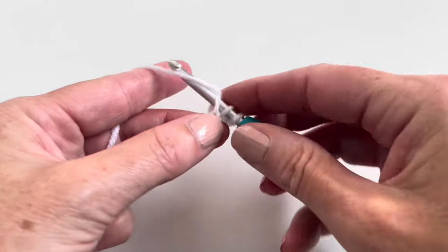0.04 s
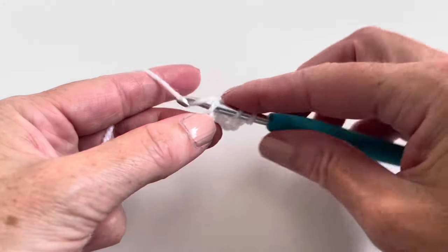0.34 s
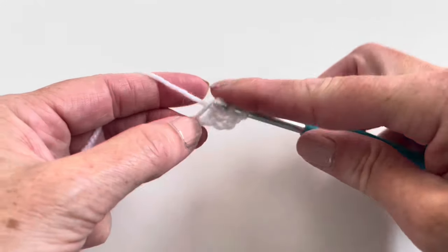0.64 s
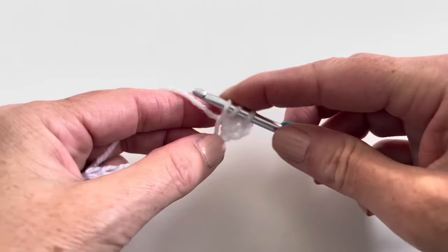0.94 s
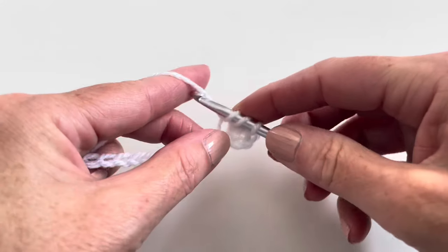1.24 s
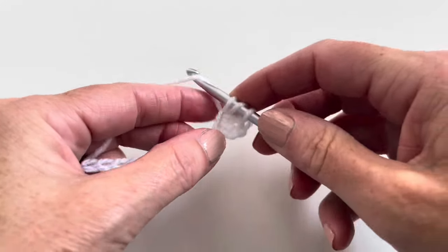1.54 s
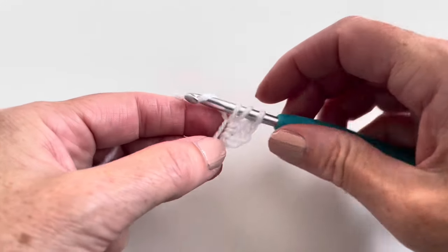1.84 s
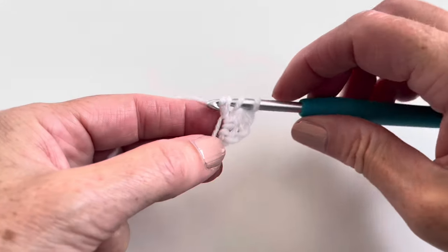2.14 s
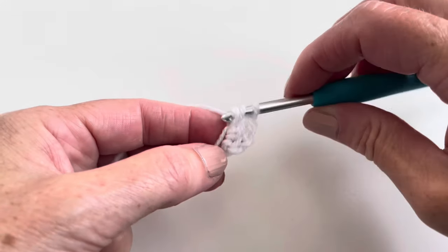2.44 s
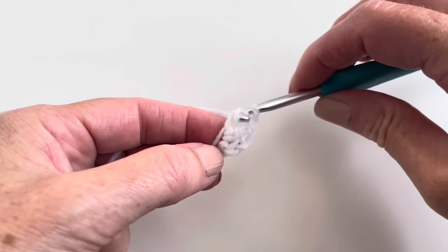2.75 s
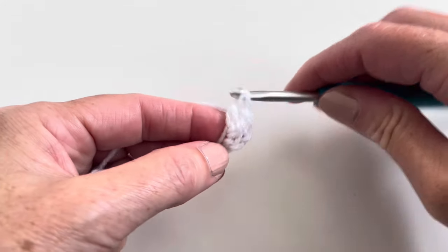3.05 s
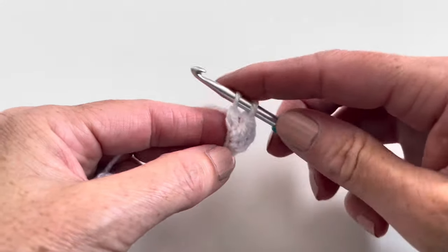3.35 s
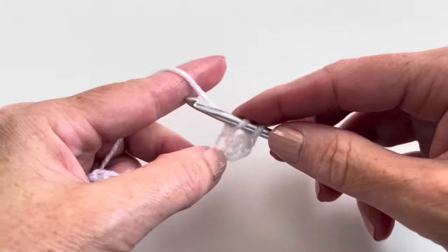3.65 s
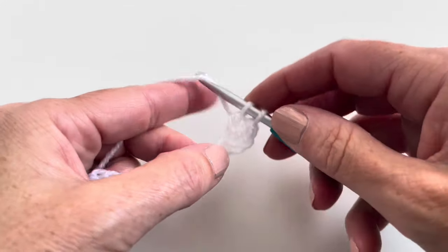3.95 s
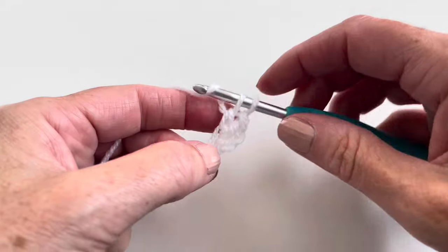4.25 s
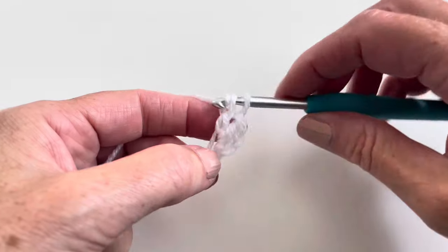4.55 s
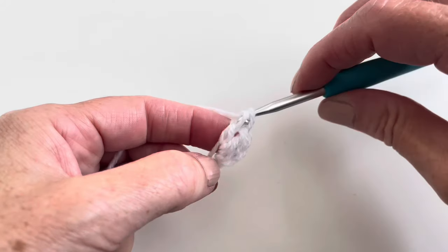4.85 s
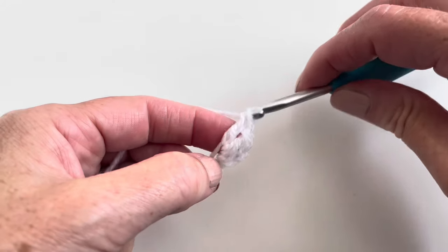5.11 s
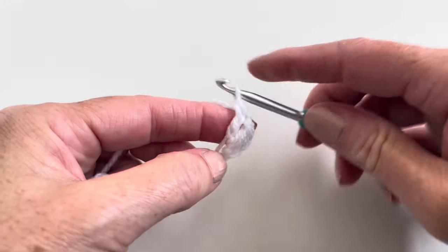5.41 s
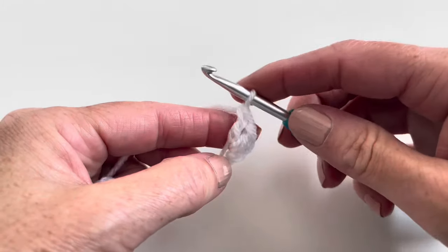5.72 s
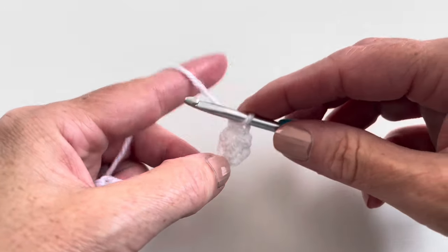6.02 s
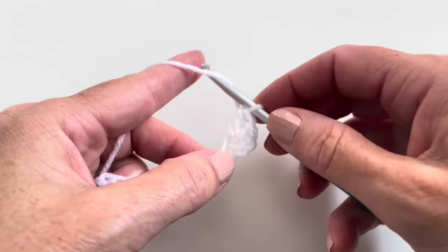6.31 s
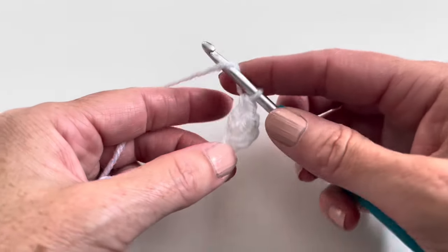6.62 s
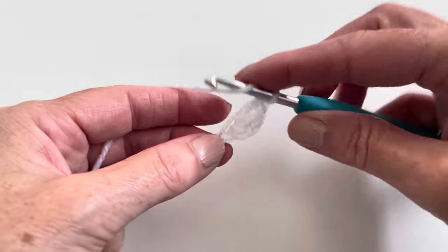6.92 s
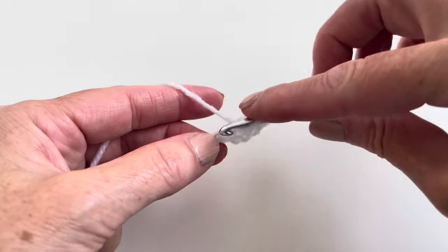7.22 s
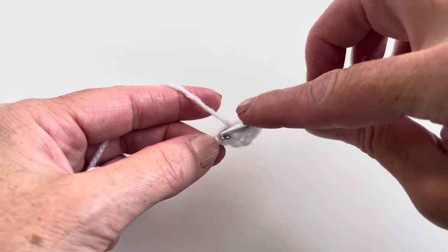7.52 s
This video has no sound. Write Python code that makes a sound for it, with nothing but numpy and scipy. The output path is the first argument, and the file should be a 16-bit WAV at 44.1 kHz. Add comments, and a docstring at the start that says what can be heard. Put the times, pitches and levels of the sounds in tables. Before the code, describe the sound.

Very quiet, close sounds of yarn being worked with a metal hook, over low indoor rumble and microphone hiss. A soft swish comes first, then one small, sharp click of the hook on a nail. After that the yarn slides and catches in brief, scattered rustles, with a few tiny ticks of slipping fibres. In the second half, far-off traffic gradually swells through the walls.

```python
"""A quiet room, with someone crocheting close to a two-port microphone. Yarn swishes through the fingers
and rasps over a metal hook in countless tiny slips; single fibres snap free and skin rubs on the grip.
The hook touches the nails lightly and once clicks against one. Behind the hands the room rumbles,
distant traffic slowly swells through the walls, and the microphone hisses."""
import sys
import numpy as np
from scipy import signal
from scipy.fft import rfft, irfft, next_fast_len
from scipy.io import wavfile
from scipy.ndimage import uniform_filter1d, map_coordinates

SR = 44100
rng = np.random.default_rng(int(sys.argv[2]) if len(sys.argv) > 2 else 0)


def dump_mix(stems):
    """Bounce the given channels to the path in sys.argv[1] as a 16-bit WAV at rate SR."""
    frames = np.atleast_2d(stems).T  # one column per channel
    limited = np.clip(frames, -1, 1)  # hard clip at full scale
    pcm = np.round(limited * 32767).astype(np.int16)
    wavfile.write(sys.argv[1], SR, pcm)


N = 342657
TIME = np.arange(N) / SR

# Tone of the mic hiss, room rumble, engines and tyres. Each row: frequency in Hz, relative level in dB.
HISS_TONE = [(300, 0.5), (1500, -8), (2600, -4.5), (4000, -8), (7000, -9), (10000, -7), (11400, 1),
             (12300, -5.5), (13000, 4.5), (13350, -9.5), (13700, -30), (15700, -43)]
ROOM_TONE = [(20, -40), (32, -38), (42, -15.5), (85, -4.5), (110, -7.5), (130, -17.5), (155, -12.5),
             (185, -21.5), (260, -27.5), (320, -25), (430, -28.5), (600, -30.5), (1000, -34), (2500, -52.5),
             (4000, -99)]
ENGINE_TONE = [(32, -41), (55, -7.5), (70, -4), (95, -4), (120, -5.5), (150, -19.5), (190, -7.5),
               (225, -13.5), (255, -14.5), (290, -21.5), (400, -26.5), (480, -35.5), (620, -48), (810, -79),
               (1400, -120)]
TYRE_TONE = [(250, -30), (400, -13), (700, -2.5), (1000, 3.5), (1400, -5), (2000, -20.5), (2600, -18),
             (4000, -33), (8000, -83)]
# Stereo width of the hiss, room, road and hands. Each row: frequency in Hz, side minus mid in dB.
HISS_STEREO = [(1000, -3.5), (1900, -4.5), (2800, 1.5), (6000, -4.5), (8200, 2), (9200, 17), (10000, 88),
               (10700, 27), (11400, 4.5), (13000, -1.5)]
ROOM_STEREO = [(60, -29), (110, -14), (200, -0.5), (380, 3), (700, 13), (1290, 4.5), (2380, -9)]
ROAD_STEREO = [(60, -47.5), (110, -19), (200, -11), (380, -3.5), (600, -1), (1000, 2.5), (1300, -8.5),
               (2000, -24), (3000, -4)]
HAND_STEREO = [(500, -19), (1200, -6), (1900, -42), (3200, -7), (4700, -14), (5600, -9.5), (6800, 0.5),
               (8200, 0), (9200, 13.5), (10000, 96), (10700, 18.5), (11500, 5.5), (13000, -5.5),
               (14000, -1)]
# Resonances of the electronics' whine and the room's boom, drone and hum.
# Each row: centre in Hz, half-width in Hz, relative level in dB.
WHINE_MODES = [(12806, 14, 0), (13037, 12, -3)]
BOOM_MODES = [(47.1, 10.9, 0)]
DRONE_MODES = [(79.8, 8.9, -1.8), (99.14, 5.9, -0.68)]
HUM_MODES = [(131.6, 7, -1), (150.1, 8, 5.5), (182.8, 16, -8.5), (226.3, 9.5, -14)]
# Fader rides for the boom, drone and hum. Each row: time in seconds, relative level in dB.
BOOM_RIDE = [(0, -78), (.3, -56), (.45, -75), (.65, -59.5), (1.3, -68), (1.52, -48.5), (1.8, -63),
             (2.35, -55.5), (2.7, -45), (2.85, -51), (3.2, -49), (3.6, -63), (4.15, -44), (4.33, -55),
             (4.42, -40), (4.52, -48), (5.25, -49.5), (5.48, -57.5), (5.65, -38.5), (5.83, -57.5),
             (5.98, -40), (6.1, -61), (6.24, -43), (6.36, -50), (6.54, -41), (6.66, -49), (6.95, -55.5),
             (7.2, -44.5), (7.42, -59), (7.57, -42), (7.77, -53.5)]
DRONE_RIDE = [(0, -57.5), (.25, -55), (.5, -73), (.63, -51.5), (.95, -56), (1.17, -51), (1.29, -58.5),
              (1.5, -50), (1.87, -56.5), (2.2, -52.5), (3.35, -54), (4.25, -52), (5.15, -50.5), (5.37, -60),
              (5.65, -51.5), (7.77, -48)]
HUM_RIDE = [(0, -77), (.3, -64.5), (.65, -64), (1, -74), (1.45, -65), (1.9, -76.5), (2.2, -61),
            (4.6, -62.5), (5.3, -63.5), (6.8, -62), (7.77, -62)]
# Fader rides for the traffic: one vehicle passes, then a closer one arrives and the tyres' upper band
# flares. Each row: time in seconds, relative level in dB.
ENGINE_RIDE = [(0, -80), (1.8, -74.5), (4.4, -67.5), (5.3, -67), (5.8, -61.5), (6.4, -63.5), (6.65, -58.5),
               (6.82, -56), (7.2, -56), (7.4, -53.5), (7.77, -54.5)]
TYRE_RIDE = [(0, -106), (3.85, -88), (4.01, -79.5), (4.14, -84.5), (4.27, -75), (4.48, -76), (4.56, -79.5),
             (4.72, -77), (4.87, -73.5), (4.99, -83.5), (5.14, -81), (5.69, -82), (5.8, -88), (5.94, -77.5),
             (6.08, -82.5), (6.18, -74), (6.26, -81), (6.34, -71.5), (6.46, -78), (6.54, -68),
             (6.61, -76.5), (6.68, -72), (6.79, -67.5), (6.92, -68.5), (7.1, -71), (7.19, -67.5),
             (7.3, -68), (7.42, -66.5), (7.54, -66), (7.6, -72), (7.68, -66.5), (7.77, -66)]
UPPER_TYRE_RIDE = [(0, -110), (6.44, -95), (6.53, -79), (6.65, -84), (6.8, -77.5), (6.97, -81.5),
                   (7.05, -78), (7.15, -94), (7.42, -81), (7.6, -88), (7.77, -76)]
# The tyres' two bands sink as each vehicle goes by. Each row: time in seconds, pitch in Hz.
TYRE_GLIDE = [(0, 1060), (4, 1066), (4.3, 987), (4.8, 922), (5.3, 970), (6.35, 940.5), (6.85, 874),
              (7.15, 900), (7.45, 928), (7.77, 881)]
UPPER_TYRE_GLIDE = [(6.5, 1936), (6.8, 1810), (6.93, 1777), (7.07, 1600), (7.38, 1830), (7.55, 1784),
                    (7.75, 1504)]

# Tone of rubbing skin, sliding yarn and a tight loop at focus 1.
# Each row: frequency in Hz, relative level in dB.
SKIN_TONE = [(150, -51), (400, 1), (800, 4), (1400, -5), (2050, -1), (2600, -2.5), (3300, -15), (8000, -62)]
YARN_TONE = [(800, -26), (2000, -19), (2700, -9), (3150, -2), (3750, -10.5), (4400, -8), (5300, -11),
             (6100, 0.5), (7000, -0.5), (8600, -3.5), (10000, 2), (11500, -1.5), (12800, -4.5),
             (13600, -14), (15700, -28)]
RASP_TONE = [(1000, -63), (3200, -30), (6100, -14), (8600, -11), (10000, -1), (11600, 0), (12800, -2.5),
             (13700, -9), (15700, -14.5)]
# Finger rubs. Each row: peak time in seconds, length in seconds, relative level in dB, resonance in Hz.
FINGER_RUBS = [(1.959, 0.16, -78.5, 1500), (2.006, 0.066, -77, 1980), (2.093, 0.062, -85, 2300),
               (3.155, 0.06, -80, 1050), (3.255, 0.08, -82.5, 2150), (5.373, 0.16, -86.5, 2200),
               (7.666, .034, -81, 2450)]
# The hook's shaft touching the nails. Each row: start in seconds, level in dB, pitch in Hz.
NAIL_TAPS = [(.628, -69.5, 3460), (4.714, -69.5, 3880), (7.21, -73, 3700)]
# The hook's ring. Each row: frequency in Hz, relative level in dB, time to fall 60 dB in seconds.
HOOK_MODES = [(3950, -10.5, 0.0067), (5840, -1.5, 0.0046), (7600, -1.5, 0.0042), (9700, 1, 0.004),
              (11000, -1, 0.0033)]
# Hook on nail, contact then rebound. Each row: start in seconds, relative level in dB.
CLICK_HITS = [(1.5505, -40), (1.5517, -63)]
# A tight loop on the hook. Each row: peak time in seconds, length in seconds, level in dB,
# focus (1 is broad and crisp, 2 a thin squeak).
LOOP_RASPS = [(.905, .045, -69.5, 1), (2.125, .04, -75.5, 1.9), (2.61, 0.11, -72, 0.95),
              (2.996, .065, -69, 1.2), (3.461, 0.067, -68.5, 0.88), (5.226, 0.06, -68, 1.3),
              (5.919, 0.071, -80, 2), (6.42, .036, -66.5, 2.8), (6.77, 0.1, -74.5, 2.7)]
# Fibres slipping off the hook. Each row: start in seconds, peak in dB, brightness in dB per octave.
FIBRE_SNAPS = [(3.982, -54, 17), (5.06, -66, -12), (5.849, -64, 4)]
# Yarn drawn through the fingers and the stitch.
# Each row: peak time in seconds, length in seconds, level in dB, brightness in dB per octave.
YARN_PULLS = [(.385, 0.27, -69.5, 7.5), (.44, 0.11, -70.5, 3), (.625, 0.047, -83, -9),
              (.63, 0.077, -77, 14), (1.578, .03, -70, 6), (2.69, 0.1, -72.5, 2), (3.25, 0.11, -75, 9),
              (3.455, 0.09, -67, -3), (3.51, 0.12, -66, 1), (3.66, 0.055, -71, 3), (4.835, 0.11, -72, 10),
              (5.063, 0.033, -72.5, 5), (5.918, 0.15, -63.5, 0), (6.05, 0.076, -75.5, -2.5),
              (6.135, 0.073, -73, 0), (7.02, 0.16, -80, -1), (7.665, .025, -77, -1)]


def amp(db):
    """Decibels to gain."""
    return 10 ** (np.asarray(db) / 20)


def unit(x):
    """Scale to rms 1."""
    return x / np.sqrt(np.mean(x ** 2) + 1e-20)


def along(points, hz):
    """Read (Hz, value) points on a log frequency axis."""
    freqs, values = np.transpose(points)
    return np.interp(np.log(hz + 1), np.log(freqs + 1), values)


def curve(points):
    """Join (seconds, value) points into one value per sample."""
    return np.interp(TIME, *np.transpose(points))


def wobble(rate, size=N):
    """A smooth random curve, rate knots a second."""
    knots = rng.standard_normal(int(size * rate / SR) + 4)
    return map_coordinates(knots, [np.arange(size) * rate / SR])


def add(track, s, sound):
    """Mix a sound into a track from s seconds."""
    start = round(s * SR)
    sound = sound[max(-start, 0):max(N - start, 0)]
    track[max(start, 0):][:len(sound)] += sound


def filtered(x, response):
    """EQ x with a complex gain given as a function of Hz."""
    size = x.shape[-1]
    padded = next_fast_len(size + 4096)
    return irfft(rfft(x, padded) * response(np.fft.rfftfreq(padded, 1 / SR)), padded)[..., :size]


def mid_side(width, hz):
    """Gains of the sum and difference of the two ports, at constant power."""
    turn = np.arctan(amp(along(width, hz)))
    return np.array([np.cos(turn), np.sin(turn)])


def diffuse(tone, width, patchy_db):
    """A stereo noise bed of rms 1 from all around, its colour shifting in slow patches."""
    frames = signal.stft(rng.standard_normal((2, N)), nperseg=1024)[2]
    patches = uniform_filter1d(rng.standard_normal(frames.shape[1:]), size=4, axis=0)
    patches = unit(uniform_filter1d(patches, size=13, axis=1))
    noise = signal.istft(frames * amp(patchy_db * patches), nperseg=1024)[1][:, :N]
    mid, side = filtered(noise, lambda hz: amp(along(tone, hz)) * mid_side(width, hz))
    return unit(np.array([mid + side, mid - side]))


def resonant(modes):
    """Narrow resonances kept ringing by noise, rms 1."""
    def peaks(hz):
        return sum(amp(db) / (1 + ((hz - centre) / width) ** 2) ** 2 for centre, width, db in modes)
    return unit(filtered(rng.standard_normal(N), peaks))


def steadied(x, seconds):
    """Even out the slow chance swells in x."""
    return x / np.sqrt(np.abs(uniform_filter1d(x ** 2, int(seconds * SR))) + 1e-6)


def microphone():
    """Self-noise, with a thin electronic whine on top."""
    whine = np.array([resonant(WHINE_MODES), resonant(WHINE_MODES)])
    return amp(-73.5) * diffuse(HISS_TONE, HISS_STEREO, patchy_db=2) + amp(-89.5) * whine


def room():
    """A steady rumble under three low room resonances that swell and sink."""
    boom = amp(curve(BOOM_RIDE) - .76 + 1.2 * wobble(rate=12)) * steadied(resonant(BOOM_MODES), .19)
    drone = amp(curve(DRONE_RIDE) - .58 + 2.24 * wobble(rate=12)) * steadied(resonant(DRONE_MODES), .15)
    hum = amp(curve(HUM_RIDE)) * steadied(resonant(HUM_MODES), .25)
    rumble = amp(-59.5 + .7 * wobble(rate=8)) * diffuse(ROOM_TONE, ROOM_STEREO, patchy_db=1.73)
    return rumble + boom + drone + hum


def roar(glide, half_width_hz, direct_db):
    """Tyre noise in a band of gliding pitch; its direct part reaches the right port first."""
    lowpass = signal.butter(2, half_width_hz, fs=SR, output="sos")
    slow = signal.sosfilt(lowpass, rng.standard_normal((2, 3, N)))
    phase = 2 * np.pi * np.cumsum(curve(glide)) / SR
    left, right, direct = slow[0] * np.cos(phase) + slow[1] * np.sin(phase)
    late = np.roll(direct, round(.00052 * SR))
    return unit(np.array([left, right]) + amp(direct_db) * np.array([late, direct]))


def traffic():
    """Far vehicles through the walls: engines murmur, tyres surge near 900 Hz and an octave above."""
    tyres = roar(TYRE_GLIDE, half_width_hz=115, direct_db=-8)
    tyres += amp(-8) * diffuse(TYRE_TONE, ROAD_STEREO, patchy_db=3)
    mid, side = roar(UPPER_TYRE_GLIDE, half_width_hz=170, direct_db=-21)
    upper = unit(mid + amp(-12.5) * np.array([side, -side]))
    flutter = amp(1.2 * wobble(rate=24))  # an uneven road surface
    engine_db = curve(ENGINE_RIDE) + 5.5 + 1.6 * wobble(rate=13)
    engines = amp(engine_db) * diffuse(ENGINE_TONE, ROAD_STEREO, patchy_db=1.5)
    return engines + flutter * (amp(curve(TYRE_RIDE) + 2) * tyres + amp(curve(UPPER_TYRE_RIDE)) * upper)


def friction(size, tone, tilt_db, grain_db):
    """Countless tiny slips of uneven size, each under a millisecond long; tilt_db is per octave."""
    def colour(hz):
        return amp(along(tone, hz) + tilt_db * np.log2(np.clip(hz, 1000, 12000) / 1000))
    slips = amp(grain_db * unit(uniform_filter1d(rng.standard_normal(size), size=30)))
    return unit(filtered(slips * rng.standard_normal(size), colour))


def slide(peak_s, length, db, tone, grain_db, tilt_db=0):
    """A track with one sliding move that speeds up, holds and slows, catching and letting go."""
    rise_share, squareness = .42, 2.56  # squarer gives a quicker start and a longer hold
    rise = length * rise_share
    fall = length - rise
    t = np.arange(-2 * rise, 2 * fall, 1 / SR)
    speed = np.exp(-np.abs(t / np.where(t < 0, rise, fall)) ** squareness)
    catching = amp(1.43 * wobble(rate=80, size=len(t)))
    out = np.zeros(N)
    add(out, peak_s - 2 * rise, amp(db) * speed * catching * friction(len(t), tone, tilt_db, grain_db))
    return out


def fingers():
    """Skin drags on the hook's grip with a dull, grainy rub; each grip rings at its own pitch."""
    ring_db, sharpness = 11, 8
    out = np.zeros(N)
    for peak_s, length, db, ring_hz in FINGER_RUBS:
        rub = slide(peak_s, length, db, SKIN_TONE, grain_db=3.5)
        out += filtered(rub, lambda hz: amp(ring_db / (1 + (sharpness * (hz / ring_hz - 1)) ** 2)))
    return out


def taps():
    """Each light touch of shaft and nail rings one short, damped note."""
    out, t = np.zeros(N), np.arange(SR // 20) / SR
    attack = 1 - np.exp(-t / .0003)
    for s, db, hz in NAIL_TAPS:
        add(out, s, amp(db - 60 * t / .027) * attack * np.sin(2 * np.pi * hz * t))
    return out


def click():
    """The hook strikes a nail; the grip damps its ring within milliseconds and the table scatters it."""
    out, t = np.zeros(N), np.arange(SR // 12) / SR
    ring = sum(amp(db - 60 * t / t60) * np.sin(2 * np.pi * hz * t) for hz, db, t60 in HOOK_MODES)
    crack = amp(-9 - 60 * t / .005) * friction(len(t), YARN_TONE, tilt_db=1.3, grain_db=0)
    scatter = amp(-29 - 60 * t / .11) * friction(len(t), YARN_TONE, tilt_db=.5, grain_db=1)
    attack = 1 - np.exp(-t / .00015)
    for s, db in CLICK_HITS:
        add(out, s, amp(db) * (ring + crack + scatter) * attack)
    return out


def rasps():
    """A tight loop catches hard on the hook; the tighter it is, the more it narrows to one high band."""
    return sum(slide(peak_s, length, db, np.multiply(RASP_TONE, [1, focus]), grain_db=3)
               for peak_s, length, db, focus in LOOP_RASPS)


def snaps():
    """Single fibres slip off the hook, each a tick of fast-dying friction."""
    out, t = np.zeros(N), np.arange(SR // 50) / SR
    for s, db, tilt_db in FIBRE_SNAPS:
        snap = amp(-60 * t / .018) * friction(len(t), YARN_TONE, tilt_db, grain_db=2)
        add(out, s, amp(db) * snap / np.abs(snap).max())
    return out


def yarn():
    """Yarn swishes through the fingers with each pull; the taut strand never lies quite still."""
    pulls = sum(slide(peak_s, length, db, YARN_TONE, grain_db=1.5, tilt_db=tilt_db)
                for peak_s, length, db, tilt_db in YARN_PULLS)
    rustle = amp(-89 + 4.5 * wobble(rate=9)) * friction(N, YARN_TONE, tilt_db=2, grain_db=2.5)
    return pulls + rustle


def close_up(x, wet_db, t60):
    """The hands, with a short room tail, reach the left port first; near 10 kHz the ports oppose."""
    t = np.arange(SR // 4) / SR
    tail = rng.standard_normal((2, len(t))) * amp(-60 * t / t60)
    reverb = signal.fftconvolve(x[None], tail / np.linalg.norm(tail[0]), axes=1)[:, :N]
    quadrature = np.array([[1], [1j]])  # turning the side by 90 degrees gives the left a phase lead
    mid, side = filtered(x + amp(wet_db) * reverb, lambda hz: mid_side(HAND_STEREO, hz) * quadrature)
    return np.array([mid + side, mid - side])


def scene():
    """Hiss, room and road behind, hands in front."""
    hands = fingers() + taps() + click() + rasps() + snaps() + yarn()
    return microphone() + room() + traffic() + close_up(hands, wet_db=-9, t60=.099)


def record(dry):
    """The recorder cuts the deepest rumble and keeps nothing above its band limit."""
    low_cut_hz, top_hz = 36, 15700
    return filtered(dry, lambda hz: (hz < top_hz) / np.sqrt(1 + (low_cut_hz / (hz + 1)) ** 20))


dry = scene()
out = record(dry)
dump_mix(out)
```